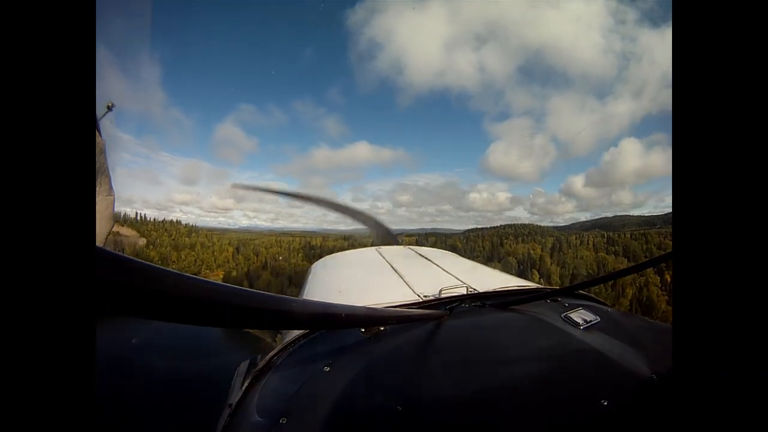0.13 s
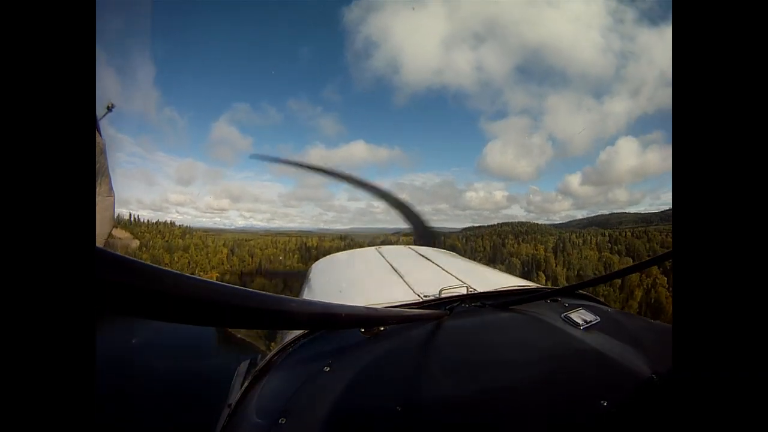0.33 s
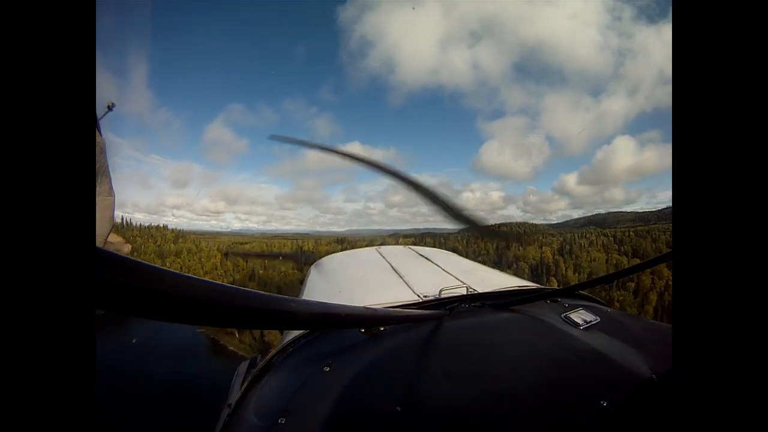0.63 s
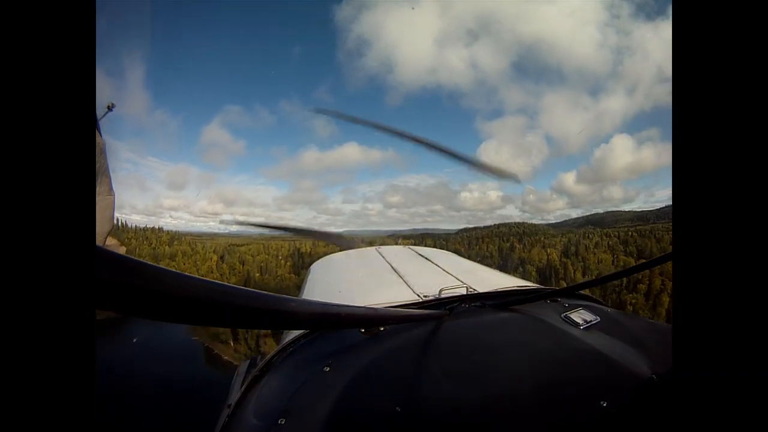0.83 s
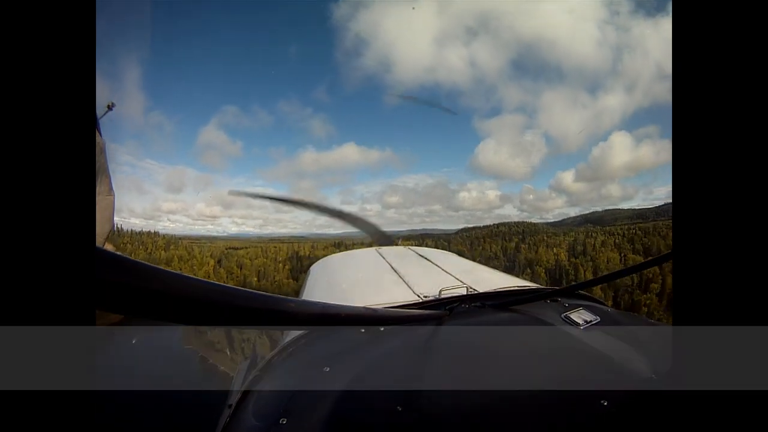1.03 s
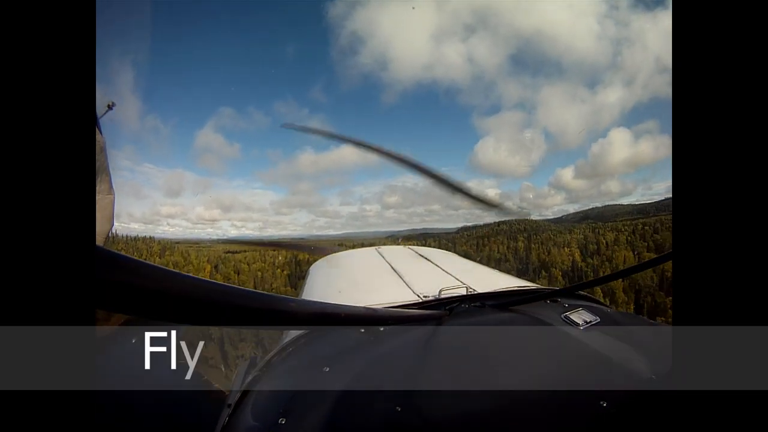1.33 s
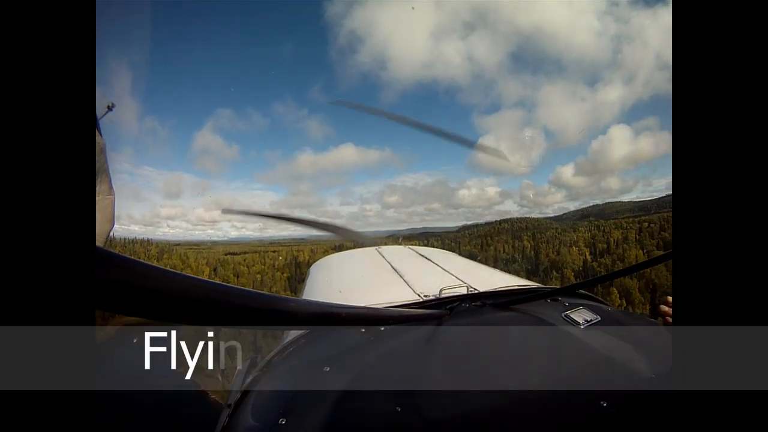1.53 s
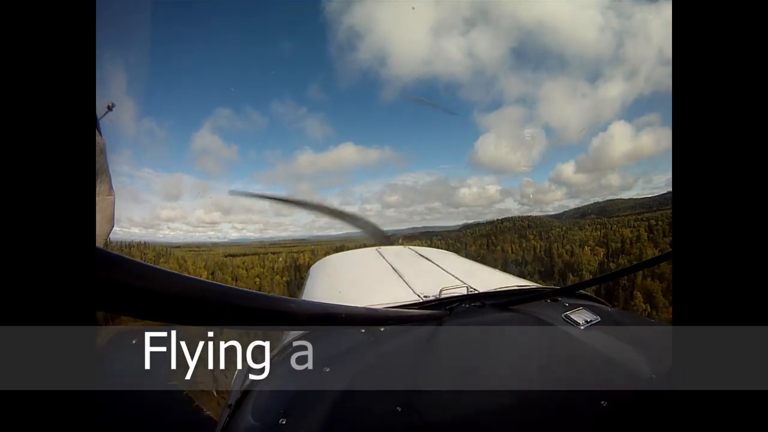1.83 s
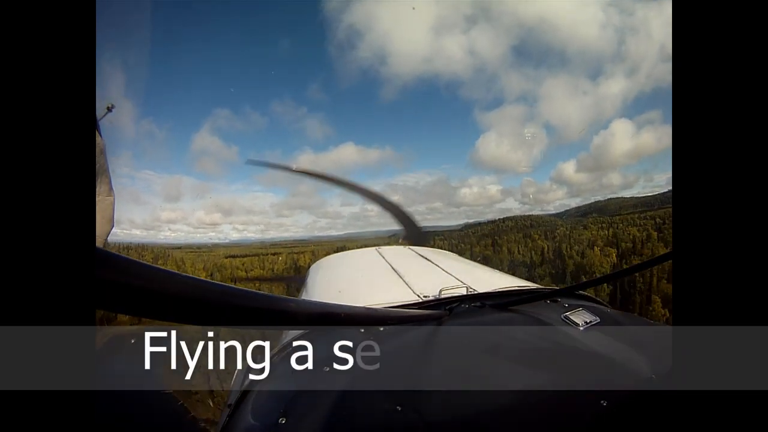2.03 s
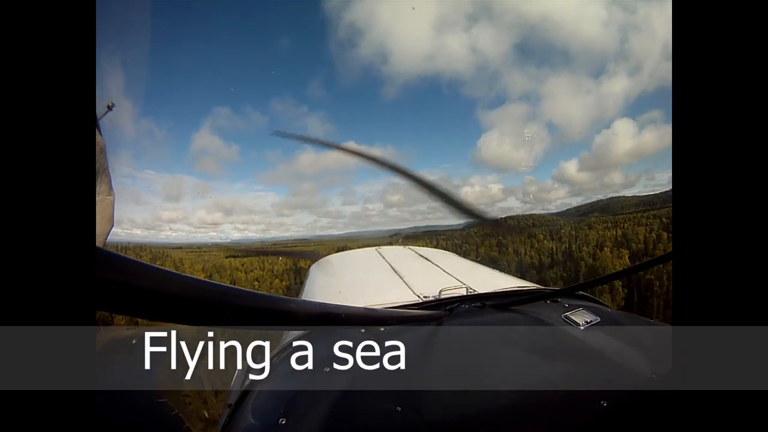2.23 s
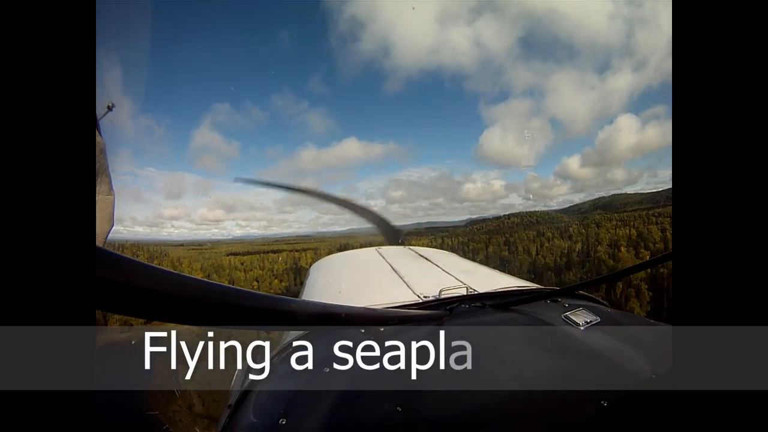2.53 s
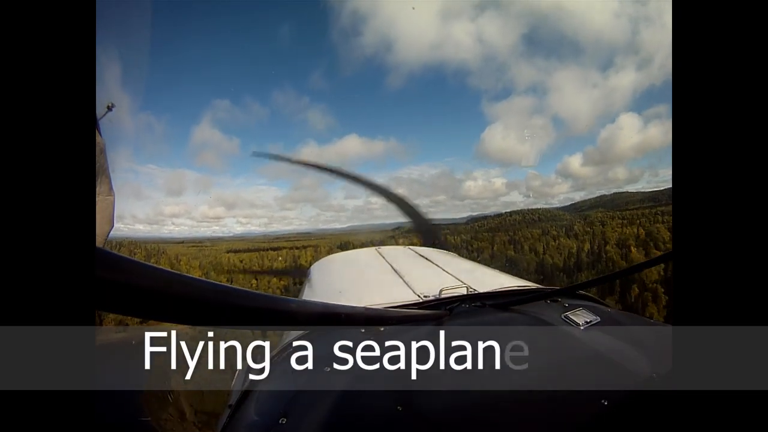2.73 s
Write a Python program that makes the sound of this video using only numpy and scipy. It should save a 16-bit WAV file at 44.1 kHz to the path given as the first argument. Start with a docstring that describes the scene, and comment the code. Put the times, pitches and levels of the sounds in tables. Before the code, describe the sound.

A small piston-engine propeller plane drones loudly at constant speed, heard close inside the cockpit; rough exhaust rasp, occasional soft thumps, gusty low air rumble and a faint windscreen hiss continue throughout.

```python
"""Inside a small cockpit at steady cruise: a four-cylinder piston engine and its two-blade propeller.
Firings and blade passes share one deep drone; lines at the cycle rate, from unequal cylinders, fill it in.
Exhaust puffs of random strength add roughness and now and then a thump; combustion roar rasps.
Turbulent air pulsing off the blades rings cabin resonances.
The slipstream is shaped noise: a gusty rumble on the hull and a hiss at the windscreen."""
import sys
import numpy as np
from scipy import signal
from scipy.fft import rfft, irfft
from scipy.io import wavfile

SR = 44100
rng = np.random.default_rng(int(sys.argv[2]) if len(sys.argv) > 2 else 0)


def wrap_up_sound(samples):
    """Save the sound to the file named by the first command line argument, as 16-bit audio."""
    columns = np.atleast_2d(samples).T
    # keep every value between -1 and 1, then stretch to whole-number steps
    tamed = np.clip(columns, -1, 1)
    steps = np.round(tamed * 32767).astype(np.int16)
    wavfile.write(sys.argv[1], SR, steps)


N = 127449

CYCLE_HZ = 21.568  # one engine cycle is two shaft turns, four firings and four blade passes
FIRINGS = 4  # per cycle
BURN_LAG_S = 0.0036  # crest of the rasp, hiss chop and blade wash, into the cycle

# exhaust strokes as they reach the cabin: [t into the cycle/s, relative level/dB]
EXHAUST_STROKES = [(.0011, 1), (0.01, -8), (0.0221, -3), (0.0371, -1)]


def undb(db):
    """Decibels to gain."""
    return 10 ** (np.asarray(db) / 20)


def unit(x):
    """Scale to rms 1."""
    return x / np.sqrt(np.mean(np.abs(x) ** 2))


def bins():
    """Frequency of each spectral bin in Hz, kept above zero for logs and division."""
    return np.maximum(np.arange(N // 2 + 1) * SR / N, 1e-3)


def curve(points):
    """Join (s, value) points by straight lines."""
    return np.interp(np.arange(N) / SR, *np.array(points).T)


def spectrum_db(points):
    """Join (Hz, dB) points along log frequency, one value per bin."""
    hz, db = np.array(points).T
    return np.interp(np.log(bins()), np.log(hz), db)


def colour(x, points, scale=1):
    """Filter by a curve of (Hz, dB) points."""
    return irfft(rfft(x) * undb(scale * spectrum_db(points)), N)


def noise(points):
    """Noise at rms 1 with a spectrum of (Hz, dB) points, falling away beyond them."""
    low_hz, high_hz = points[0][0], points[-1][0]
    gain = undb(spectrum_db(points))
    gain = gain * np.minimum(bins() / low_hz, 1) ** 2 * np.minimum(high_hz / bins(), 1) ** 2
    return unit(irfft(rfft(rng.standard_normal(N)) * gain, N))


def walk(rate_hz):
    """Smooth random motion of spread 1, fading out above about rate_hz."""
    spectrum = rfft(rng.standard_normal(N)) * np.exp(-.5 * (bins() / rate_hz) ** 2)
    spectrum[0] = 0
    return unit(irfft(spectrum, N))


def beat(cycle, lag_s, order=FIRINGS):
    """A swing from -1 to 1, `order` times a cycle, with its crest lag_s into the cycle."""
    return np.cos(order * (cycle - 2 * np.pi * CYCLE_HZ * lag_s))


def wavering(size=512):
    """Slow sway and quick flutter of one line's strength and phase, as a complex envelope."""
    sway_hz, flutter_hz, flutter_share = 2.4, 5.6, 0.68
    f = np.fft.fftfreq(size, N / SR / size)
    sway = unit(np.exp(-.5 * (f / sway_hz) ** 2))
    flutter = unit(1 / (1 + (f / flutter_hz) ** 2))
    chance = rng.standard_normal(size) + 1j * rng.standard_normal(size)
    # f != 0 removes the constant part
    motion = unit(np.fft.ifft(chance * (sway + flutter_share * flutter) * (f != 0)))
    return np.interp(np.linspace(0, size - 1, N), np.arange(size), motion)


def line(cycle, order, db, unsteady):
    """One engine line, part steady and part wavering, its phase set by the exhaust strokes and scattered."""
    smear_per_khz = 0.87  # spread in radians of the cabin's scatter, growing with frequency
    hz = order * CYCLE_HZ
    share = np.clip(unsteady, 0, 1)
    strength = np.sqrt(1 - share ** 2) + share * wavering()
    strokes = -sum(undb(stroke_db) * np.exp(-2j * np.pi * hz * s) for s, stroke_db in EXHAUST_STROKES)
    smear = smear_per_khz * hz / 1000 * rng.standard_normal()
    phase = order * cycle + np.angle(strokes) + smear
    return np.sqrt(2) * undb(db) * (strength * np.exp(1j * phase)).real


def drone(cycle):
    """The firing and blade-pass tone with its overtones, over the shudder of the shaft."""
    # overtones that waver at random about a fixed level:
    # [multiple of the firing rate, level/dB, unsteady share 0-1]
    overtone_lines = [(2, -36.5, 0.7), (4, -40, 0.41), (7, -45, .6), (8, -46.5, 0.56), (9, -59.5, 1),
                      (10, -47, 0.16)]
    # swell and fade of the 3rd, 5th and 6th multiples of the firing rate: [t/s, level/dB]
    third_swell = [(0, -32.5), (.2, -28.5), (0.551, -38.5), (.8, -35), (1.25, -29.5), (1.55, -34),
                   (2.05, -37.5), (2.5, -28), (2.89, -30.5)]
    fifth_swell = [(0, -50), (.25, -34), (.6, -26.5), (.86, -42.5), (1.0, -36), (1.33, -29), (1.6, -34),
                   (1.95, -26.5), (2.08, -32), (2.35, -27), (2.63, -37.5), (2.8, -34)]
    sixth_swell = [(0, -38), (.4, -31), (.9, -33), (1.2, -32), (1.5, -51), (1.9, -38), (2.35, -31.5),
                   (2.89, -48)]
    swell_unsteady = 0.12
    level_db, waver_db, flutter_db = -15, 0.18, 0.06
    lope = 0.1  # depth of the throb once a cycle, from strong and weak cylinders
    drone_lag_s, lope_lag_s, shaft_lag_s = 0.0037, 0.013, 0.019
    shaft_db = -33

    level = undb(level_db + waver_db * walk(4.4) + flutter_db * walk(32))
    deep = np.sqrt(2) * level * beat(cycle, drone_lag_s)
    deep = deep * (1 + lope * beat(cycle, lope_lag_s, order=1))
    shudder = np.sqrt(2) * undb(shaft_db) * beat(cycle, shaft_lag_s, order=2)  # once a shaft turn
    swells = [(3, third_swell), (5, fifth_swell), (6, sixth_swell)]
    swelling = sum(line(cycle, k * FIRINGS, curve(points), swell_unsteady) for k, points in swells)
    overtones = sum(line(cycle, k * FIRINGS, db, unsteady) for k, db, unsteady in overtone_lines)
    return deep + shudder + swelling + overtones


def cylinders(cycle):
    """No two cylinders fire alike, so lines at the cycle rate fill the gaps between the overtones."""
    # lines from unequal cylinders, others lie between neighbours: [multiple of the cycle, level before trim/dB]
    cylinder_lines = [(3, -48.5), (5, -42.5), (6, -40.5), (7, -40), (9, -33), (10, -47), (11, -39.5),
                      (13, -56), (14, -41), (15, -45.5), (17, -38.5), (19, -37), (21, -41.5), (22, -40),
                      (23, -53), (25, -42), (27, -45), (29, -51.5), (30, -43), (31, -42.5), (33, -43.5),
                      (34, -65), (37, -48.5), (38, -68), (39, -50.5), (41, -53.5), (47, -58.5), (49, -52),
                      (50, -65), (51, -57), (54, -53.5), (55, -48.5), (57, -72.5), (59, -68)]
    trim_db, unsteady = -1.47, 0.25
    orders, db = np.array(cylinder_lines).T
    gaps = [k for k in range(int(orders[0]), int(orders[-1]) + 1) if k % FIRINGS]
    return sum(line(cycle, k, np.interp(k, orders, db) + trim_db, unsteady) for k in gaps)


def exhaust_puffs(size=1025):
    """Each stroke adds a short pressure puff of random size and sign; harder firings thump."""
    # harder firings of the strongest cylinder: [t/s, peak level/dB]
    thump_times = [(.465, -20), (.5575, -20), (.6503, -12), (1.2993, -22), (1.392, -21), (1.9948, -21),
                   (2.0412, -18), (2.5512, -23), (2.69, -23)]
    puff_hz, scatter_db = 204, -29.5  # centre of a puff's spectrum; spread of its size from stroke to stroke
    blows = []
    for start in np.arange(0, N / SR, 1 / CYCLE_HZ):
        for s, db in EXHAUST_STROKES:
            blows.append((start + s, undb(db + scatter_db) * rng.standard_normal()))
    thumps = [(s, undb(db)) for s, db in thump_times]
    times, sizes = np.array(blows + thumps).T
    train = np.bincount((times * SR).astype(int), sizes, N)[:N]
    spread = (np.pi * puff_hz * (np.arange(size) - size // 2) / SR) ** 2
    puff = (2 * spread - 1) * np.exp(-spread)  # a Ricker pulse, turned downward
    return signal.fftconvolve(train, puff, "same")


def ring(x, hz, width_hz):
    """A steep-skirted resonance at rms 1, about 6 dB down width_hz either side of its centre."""
    f = bins()
    response = 1 / (1 + .5j * (f * f - hz * hz) / (f * width_hz)) ** 2
    return unit(irfft(rfft(x) * response, N))


def blade_wash(cycle):
    """Turbulent air, pulsing with each blade, rings the cabin."""
    # cabin resonances: [f/Hz, half-width/Hz, level/dB]
    resonances = [(179.4, 38, -43.5), (437, 17, -38), (545, 41, -43.5), (661, 68, -41.5), (840, 48, -50),
                  (1215, 20, -60)]
    throb = 0.93  # depth of the pulsing at the blade rate
    wash = rng.standard_normal(N) * (1 + throb * beat(cycle, BURN_LAG_S))
    return sum(undb(db) * ring(wash, hz, width) for hz, width, db in resonances)


def mid_side(level, points):
    """Two independent noises, for mid and side, under one shared level."""
    return np.array([level * noise(points) for _ in range(2)])


def combustion_roar(cycle):
    """Combustion noise in the cabin, rasping as its level swings with each firing."""
    # roar spectrum: [f/Hz, relative density/dB]
    roar_shape = [(290, -9), (420, 2.5), (600, 2.5), (780, -5.5), (1000, -11), (1350, -23.5), (3000, -33)]
    level_db, flicker_db, rasp_db = -33, 0.45, 3
    rasp = unit(undb(rasp_db * beat(cycle, BURN_LAG_S)))
    return mid_side(undb(level_db + flicker_db * walk(37)) * rasp, roar_shape)


def hull_rumble():
    """Slipstream turbulence on the hull: low noise that heaves with the gusts."""
    # rumble spectrum: [f/Hz, relative density/dB]
    rumble_shape = [(10, -16), (22, -6), (55, 0.5), (100, 2.5), (150, -1), (240, -4.5), (330, -10)]
    # rumble as gusts meet the hull: [t/s, level before random gusts/dB]
    gust_levels = [(0, -28.5), (.3, -29), (.52, -31), (.65, -28.5), (.78, -29), (1.25, -28), (1.78, -33.5),
                   (1.9, -25), (2.03, -30.5), (2.3, -24), (2.65, -32.5), (2.89, -24.5)]
    gust_db = 1.6
    return mid_side(undb(curve(gust_levels) + gust_db * walk(2.5)), rumble_shape)


def screen_hiss(cycle):
    """Air rushing at the windscreen: high noise, lightly chopped by each firing and each cycle."""
    # hiss spectrum: [f/Hz, relative density/dB]
    hiss_shape = [(500, -2.5), (1200, 0.5), (1550, 1), (2000, 0), (2550, 1.5), (2950, 2), (3350, -0.5),
                  (3920, 3), (4200, -3), (4700, -2.5), (5500, -7), (7000, -7), (7750, -7), (8080, -3),
                  (8650, -8), (9200, -7.5), (10300, -15.5)]
    # slow course of the hiss: [t/s, level before flicker and chop/dB]
    hiss_course = [(0, -41), (.45, -39), (1.6, -39.5), (2.4, -39), (2.89, -40)]
    flicker_db, chop_db, lope_db = 0.5, 0.66, 0.41
    chop = chop_db * beat(cycle, BURN_LAG_S) + lope_db * beat(cycle, BURN_LAG_S, order=1)
    return mid_side(undb(curve(hiss_course) + flicker_db * walk(18) + chop), hiss_shape)


def cabin_noise(cycle):
    """Roar, rumble and hiss in stereo: narrow in the lows, wider above and leaning slightly right."""
    # stereo width: [f/Hz, side minus mid level/dB]
    side_width = [(40, -31.5), (150, -27.5), (330, -30), (490, -50), (680, -27), (1200, -15.5), (2500, -20),
                  (4500, -21), (8000, -21.5), (10000, -23)]
    # stereo balance: [f/Hz, left minus right level/dB]
    left_lean = [(680, -0.13), (1100, -1.3), (2500, -1.1), (4500, -1.3), (8500, 0.055)]
    mid, side = combustion_roar(cycle) + hull_rumble() + screen_hiss(cycle)
    side = colour(side, side_width)
    left = colour(mid + side, left_lean, 0.5)
    right = colour(mid - side, left_lean, -0.5)
    return np.array([left, right])


def scene():
    """One shaft speed, wandering very slightly, drives the engine and propeller; the air rushes past."""
    speed_wander = 0.00044  # share of the speed
    speed_hz = CYCLE_HZ * (1 + speed_wander * walk(1.2))
    cycle = 2 * np.pi * np.cumsum(speed_hz) / SR  # phase of the engine cycle in radians
    engine = drone(cycle) + cylinders(cycle) + exhaust_puffs()
    return engine + blade_wash(cycle) + cabin_noise(cycle)  # the noise is stereo, the rest is central


def record(dry):
    """The microphone has a null in the treble; the recorder cuts the top."""
    notch_hz, notch_width_hz, top_hz = 6015, 1230, 10300
    b, a = signal.iirnotch(notch_hz, notch_hz / notch_width_hz, fs=SR)
    heard = signal.lfilter(b, a, dry)
    top_cut = signal.ellip(10, .2, 90, top_hz, fs=SR, output="sos")  # 0.2 dB ripple, 90 dB stopband
    return signal.sosfilt(top_cut, heard)


dry = scene()
out = record(dry)
wrap_up_sound(out)
```